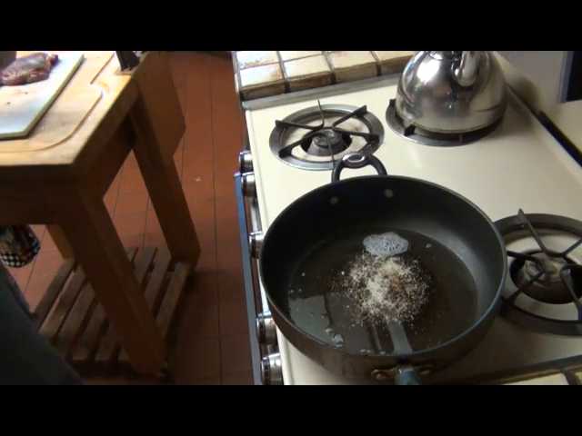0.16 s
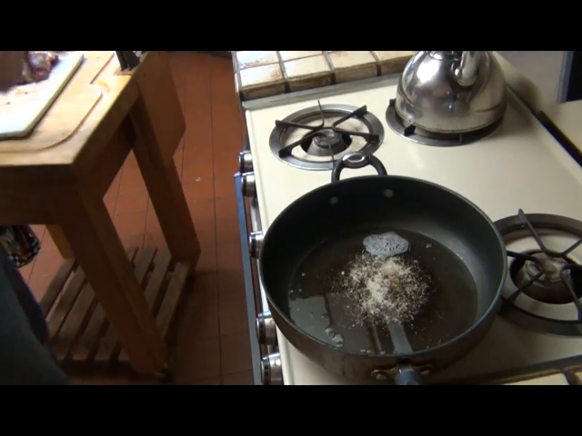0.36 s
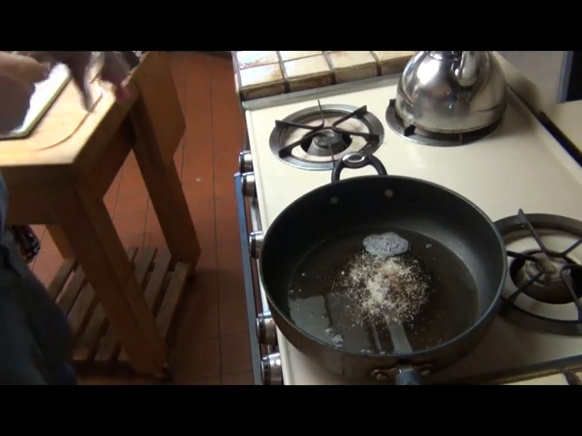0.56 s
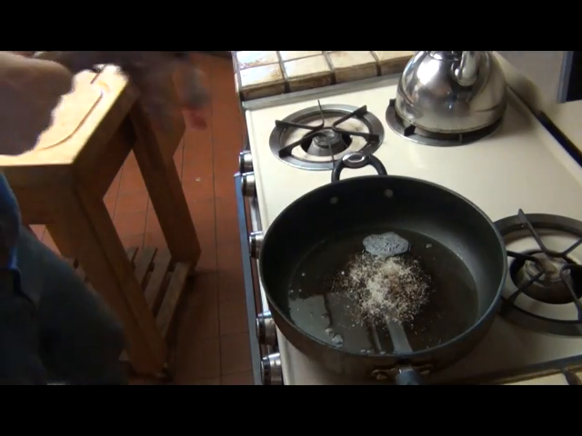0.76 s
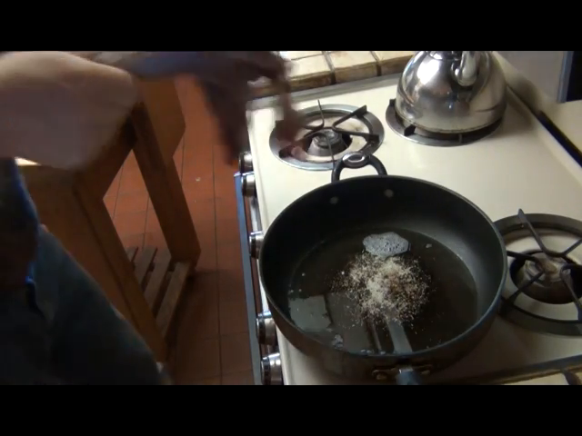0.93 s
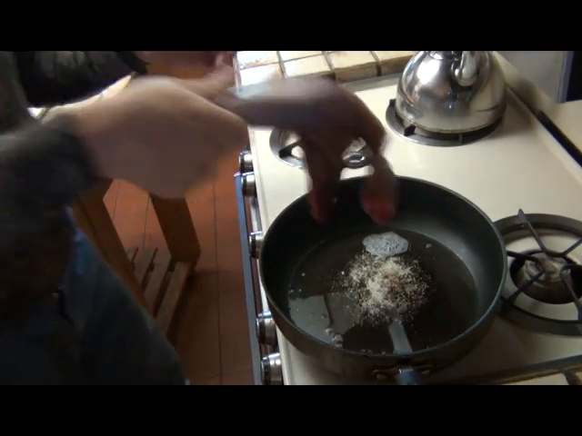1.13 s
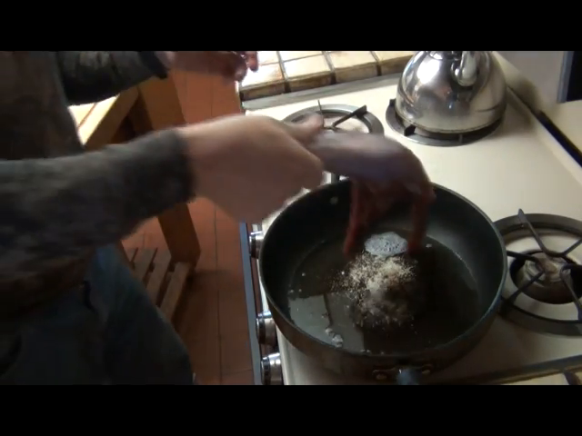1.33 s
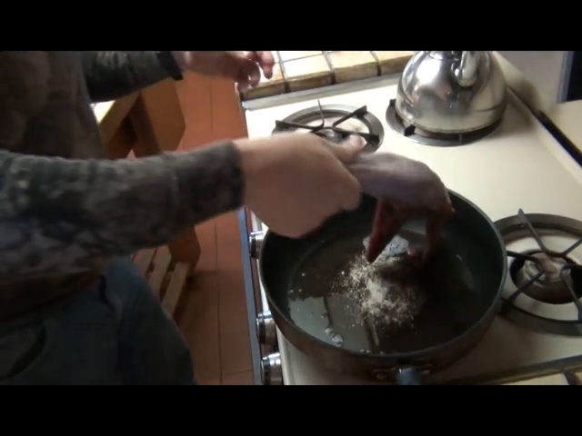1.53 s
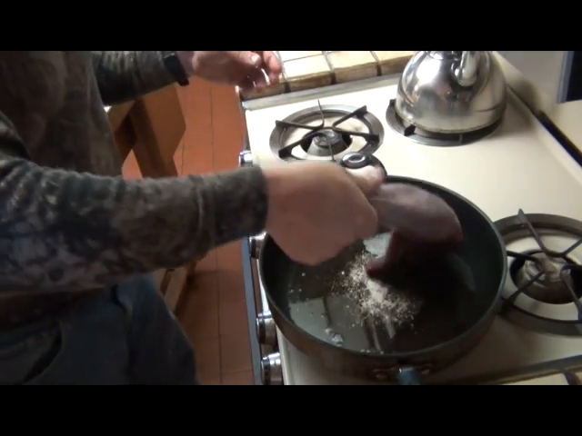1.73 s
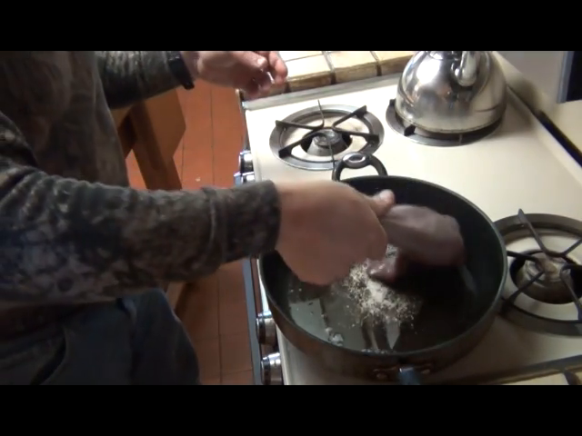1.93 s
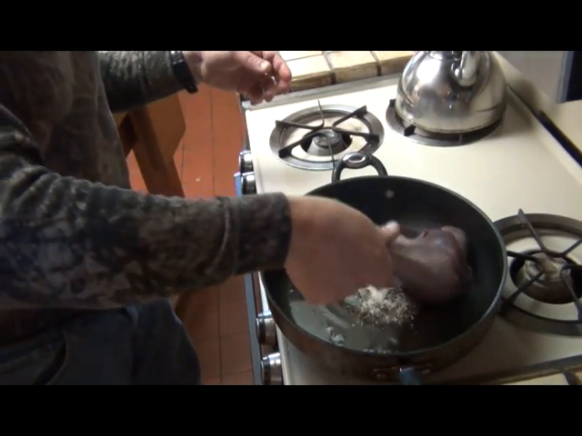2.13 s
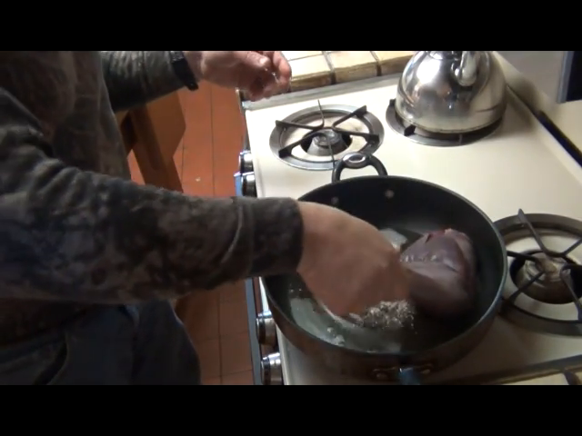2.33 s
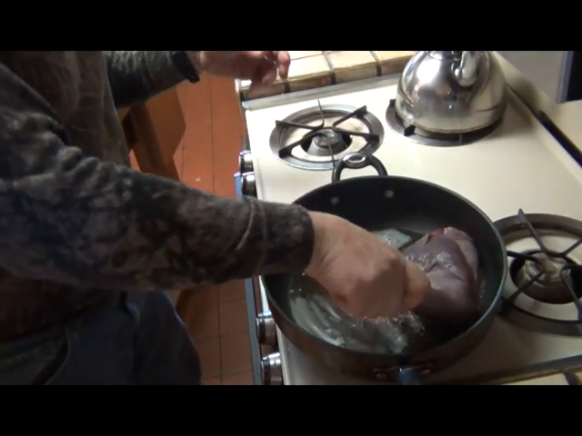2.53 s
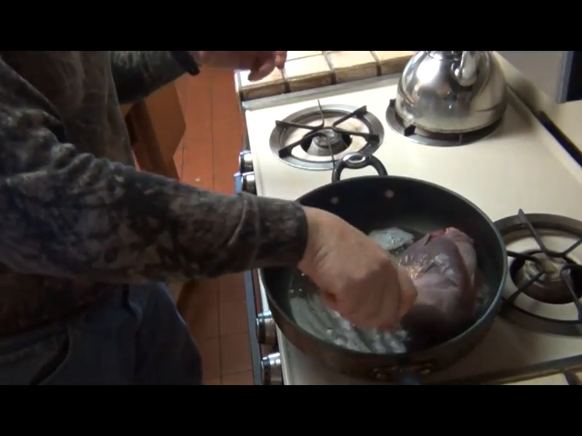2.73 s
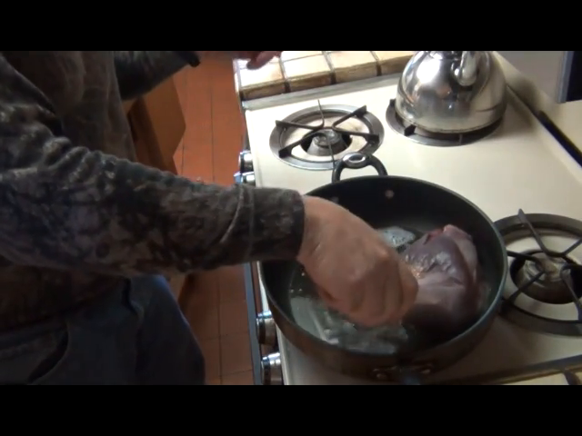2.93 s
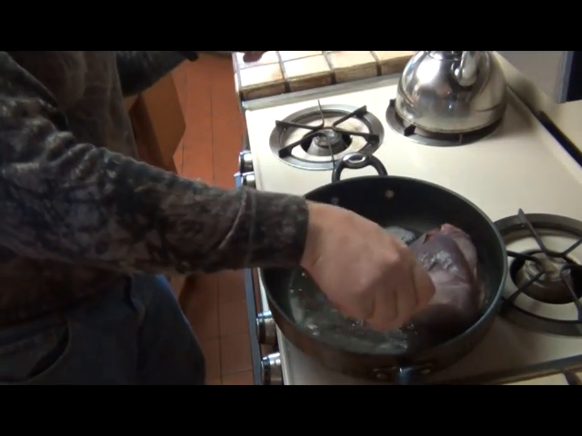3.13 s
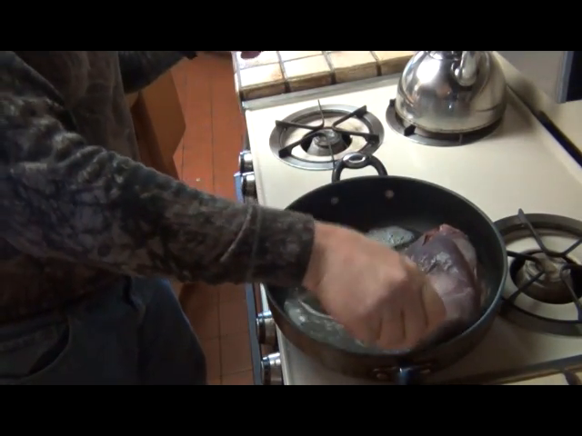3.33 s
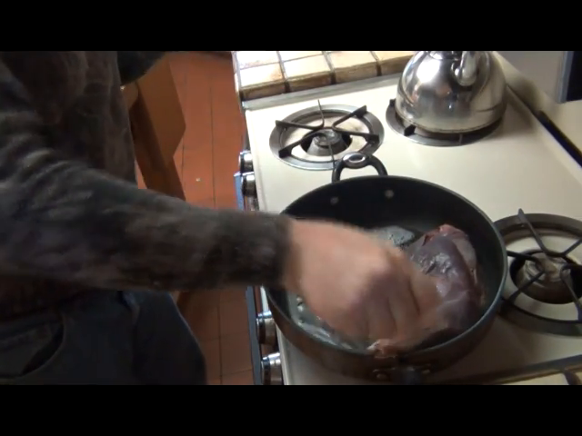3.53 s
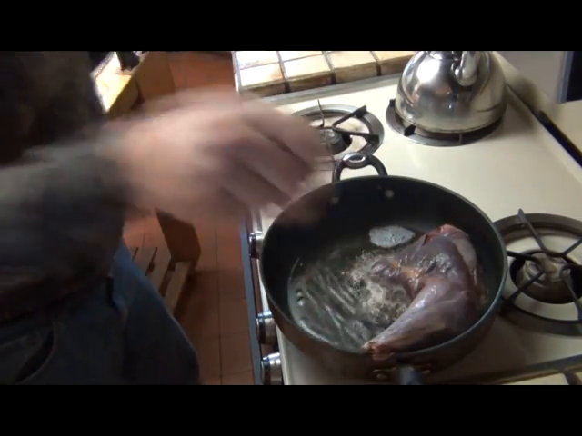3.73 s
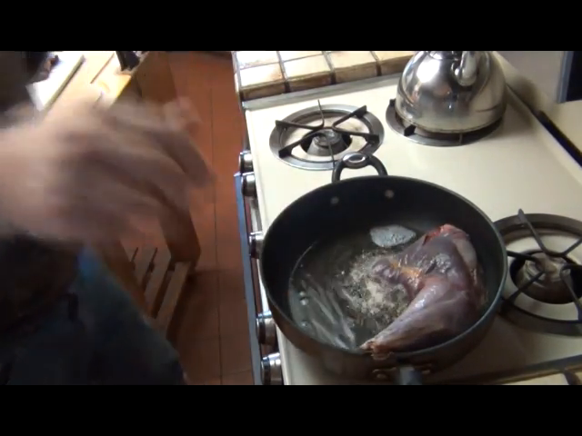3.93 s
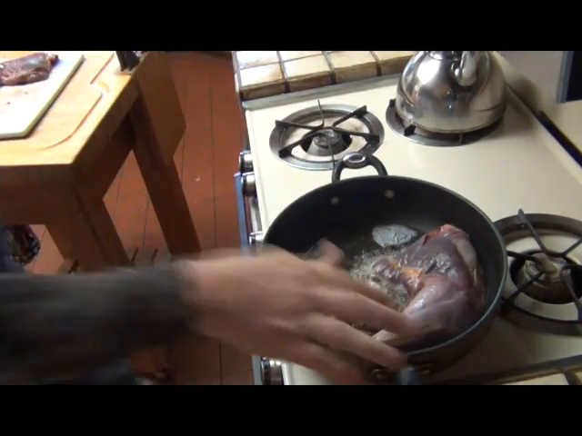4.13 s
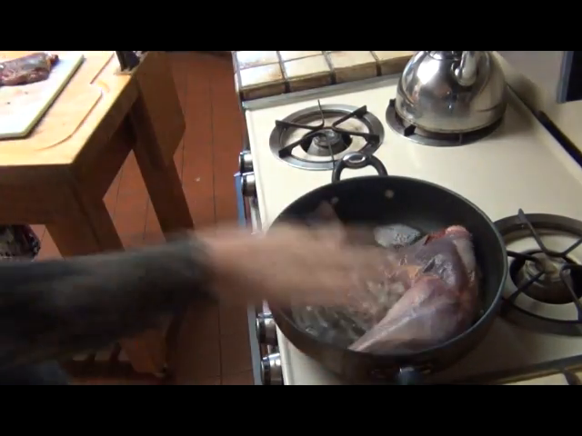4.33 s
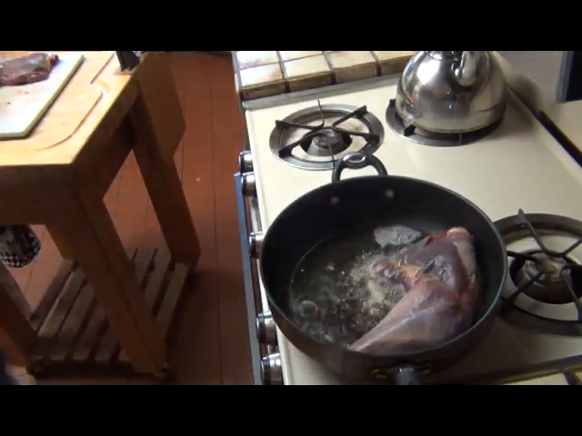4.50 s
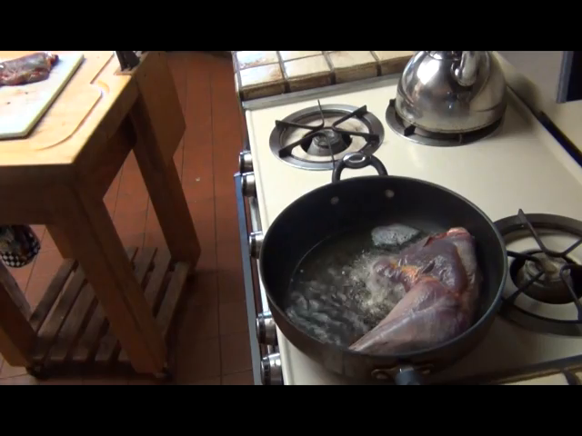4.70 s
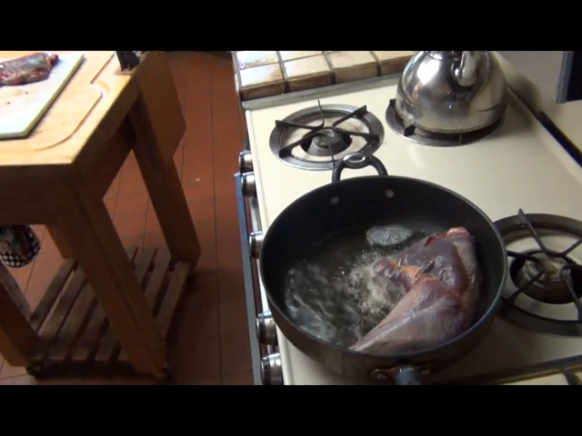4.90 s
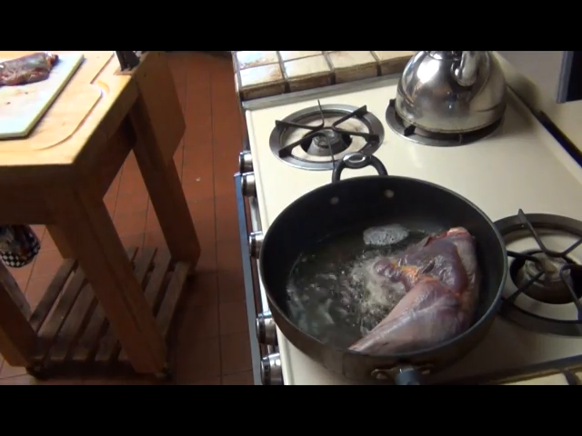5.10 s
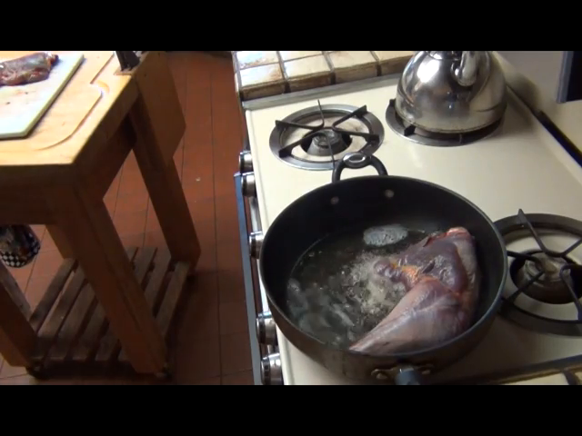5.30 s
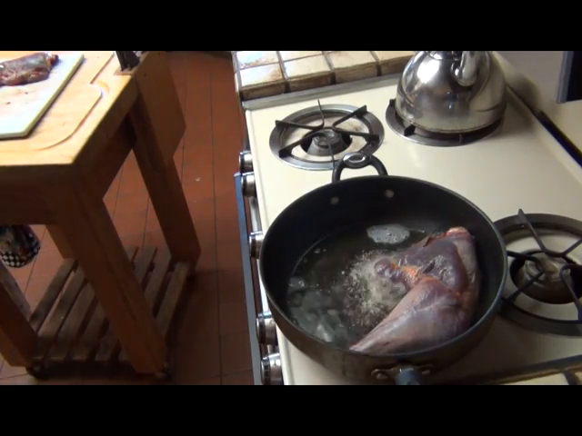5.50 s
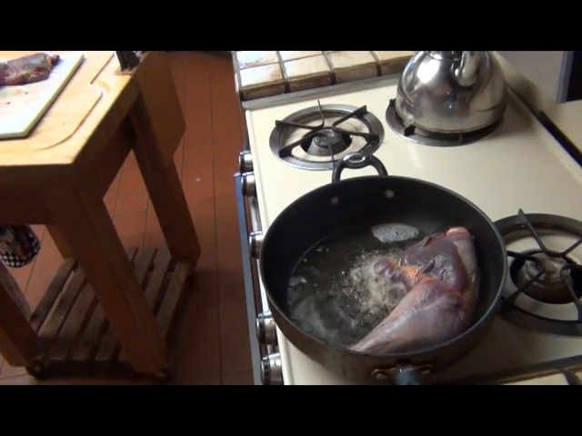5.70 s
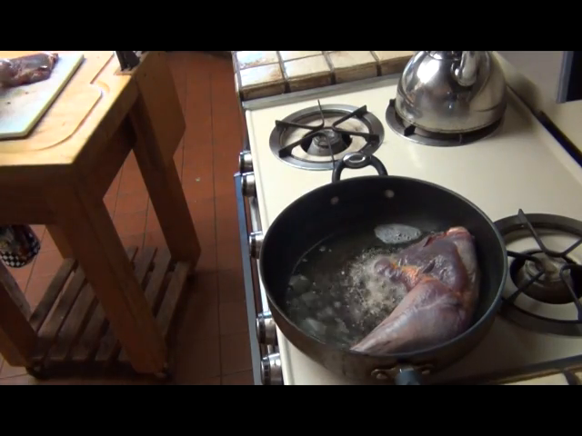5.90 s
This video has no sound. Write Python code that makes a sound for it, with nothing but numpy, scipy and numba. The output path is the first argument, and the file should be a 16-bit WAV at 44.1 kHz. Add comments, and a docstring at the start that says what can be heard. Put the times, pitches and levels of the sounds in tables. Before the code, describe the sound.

In a small home kitchen, a low burner rush and faint oil sputters last about a second and a half, with soft clothing scuffs. Wet meat touches hot oil with rapid hissing flashes that ring the skillet, then loud frying breaks out: dense crackle, bubbling plops and sharp spits, surging as it is handled. A few dull knocks come later. Close stereo microphone, fairly dry, sizzle running to the end.

```python
"""A leg of meat is laid into hot oil in a heavy skillet on a gas stove.
First burner rush, hum and hollow tone (noise, sines), knocks and scuffs of the cook (shaped noise), faint oil sputters.
The wet tip flashes to steam in quick bursts of filtered clicks, which ring the skillet wall (resonances).
Then the whole piece fries: steam clicks crackle, damped tones bubble and plop, single sharp ticks spit.
A limiter ducks everything around strong peaks; a treble cut ends the chain."""
import sys
import numpy as np
from scipy import signal
from scipy.fft import rfft, irfft
from scipy.io import wavfile
from scipy.ndimage import uniform_filter1d, minimum_filter1d
from numba import njit

SR = 44100
rng = np.random.default_rng(int(sys.argv[2]) if len(sys.argv) > 2 else 0)


def pcm_store(signal):
    """Save signal as 16-bit PCM."""
    levels = np.round(np.clip(np.atleast_2d(signal), -1, 1) * 32767)
    wavfile.write(sys.argv[1], SR, levels.astype(np.int16).T)


N = 262395
TIME = np.arange(N) / SR
# Sign of a side signal in the two channels. Each row: sign [no unit], left then right.
SIDES = np.array([[1], [-1]])


def undb(db):
    """Decibels to gain."""
    return 10 ** (np.asarray(db) / 20)


def unit(x):
    """Scale to rms 1."""
    return x / np.sqrt(np.mean(x ** 2) + 1e-18)


def curve(table):
    """Rows of (s, value), joined by straight lines in time."""
    return np.interp(TIME, *np.transpose(table))


def colour(x, points):
    """Causal minimum-phase filter with the given (Hz, dB) response."""
    hz, db = np.transpose(points)
    size = 4096
    freq = np.maximum(np.fft.rfftfreq(size, 1 / SR), 1)
    log_gain = np.log(undb(np.interp(np.log(freq), np.log(hz), db)))
    cepstrum = irfft(log_gain)
    fold = np.r_[1, np.full(size // 2 - 1, 2), 1, np.zeros(size // 2 - 1)]
    impulse_response = irfft(np.exp(rfft(cepstrum * fold)))
    return signal.fftconvolve(x, impulse_response)[:N]


def edge(x, hz, kind, order=2):
    """Butterworth low-pass or high-pass."""
    return signal.sosfilt(signal.butter(order, hz, kind, fs=SR, output="sos"), x + 1e-18)


def ring(x, modes):
    """Sum of parallel resonances, rows of (Hz, width Hz, dB)."""
    out = 0
    for hz, width_hz, db in modes:
        b, a = signal.iirpeak(hz, hz / width_hz, fs=SR)
        out = out + undb(db) * signal.lfilter(b, a, x + 1e-18)
    return out


def walk(rate_hz):
    """Random line through knots at the given rate, spread near 1."""
    knots = rng.standard_normal(N)
    return 1.2 * np.interp(TIME * rate_hz, np.arange(N), knots)


def burst(start_s, decay_s, rise_s=0.0024):
    """Quick swell, exponential fade."""
    age_s = np.maximum(TIME - start_s, 0)
    return (1 - np.exp(-age_s / rise_s)) * np.exp(-np.minimum(age_s / decay_s, 20))


def clicks(rate_hz, spread_db):
    """Random ruptures: many small, a few large, either sign."""
    size = undb(spread_db * np.minimum(rng.exponential(size=N), 6))
    struck = rng.random(N) < rate_hz / SR
    return unit(struck * size * rng.choice([-1, 1], N))


def add(out, start_s, sound):
    """Mix a short sound in at a time."""
    i = int(start_s * SR)
    out[i:i + len(sound)] += sound[:max(N - i, 0)]


# Burner and room noise response. Each row: frequency in Hz, gain in dB.
KITCHEN_RESPONSE = [(25, -8), (60, -7.5), (85, -4), (160, -3), (310, -10), (600, -8), (1100, -10.5),
                    (2000, -12.5), (3000, -9), (3600, -15.5), (5300, -18.5), (7800, -12), (10000, -21),
                    (13000, -30)]


def kitchen():
    """Steady rush of the burner with a hollow tone, and faint mains hum."""
    mid, side = (unit(colour(noise, KITCHEN_RESPONSE)) for noise in rng.standard_normal((2, N)))
    hollow = unit(ring(rng.standard_normal(N), [(864, 45, 1.0), (173, 15, -3.5)]))
    hum = undb(-69) * np.sin(2 * np.pi * 60 * TIME) + undb(-66) * np.sin(2 * np.pi * 120 * TIME)
    rush = undb(-53.5) * mid * undb(0.13 * walk(3.0))
    steady = rush + undb(-59.5) * hollow + hum
    return steady * undb(0.47 * SIDES) + undb(-67.5) * side * SIDES


# Dull knocks as meat and cook shift. Each row: start in s, level in dB, decay in s, upper edge in Hz.
KNOCKS = [(.015, -47.5, 0.047, 900), (3.79, -31, 0.0082, 650), (3.884, -27, 0.011, 560),
          (4.279, -35, 0.047, 600), (4.335, -36, 0.07, 520), (5.52, -22, 0.012, 700),
          (5.68, -38, 0.032, 323)]
KNOCK_RISE_S, CRACK_S, CRACK_DB = .0015, 0.0046, -2  # short crack at each knock, level against its thud
# Clothes and shoes scuff. Each row: centre in s, level in dB, length (full width at 1/e) in s.
SCUFFS = [(0.036, -51, 0.052), (0.157, -53, 0.22), (1.23, -45.5, 0.14), (1.333, -48, 0.17)]
# Scuff response. Each row: frequency in Hz, gain in dB.
SCUFF_RESPONSE = [(100, -23), (300, -11), (550, -3.5), (720, 2), (1100, -6), (1800, -13), (4000, -35),
                  (10000, -51)]


def cook():
    """Knocks are bursts of low noise with a crack; scuffs are swells of coloured clicks."""
    thud = edge(rng.standard_normal(N), 110, "high", order=3)
    crack = unit(edge(edge(rng.standard_normal(N), 600, "high"), 3000, "low", order=4))
    knocks = 0
    for start_s, db, decay_s, hz in KNOCKS:
        body = unit(edge(thud, hz, "low", order=4)) * burst(start_s, decay_s, KNOCK_RISE_S)
        snap = undb(CRACK_DB) * crack * burst(start_s, CRACK_S, rise_s=.0005)
        knocks = knocks + undb(db) * (body + snap)
    rub = unit(colour(clicks(5800, spread_db=2.0), SCUFF_RESPONSE))
    swells = sum(undb(db) * np.exp(-(2 * (TIME - t) / length_s) ** 2) for t, db, length_s in SCUFFS)
    return knocks + rub * swells


# Faint sputters of the hot oil. Each row: start in s, level in dB, hold in s.
SPUTTERS = [(.11, -61, .06), (.31, -54, .04), (.4, -55, 0.027), (.492, -50, 0.013), (.57, -54, .015),
            (0.702, -54, 0.032), (0.923, -47.5, 0.17)]
# longer sputters also die away more slowly
SPUTTER_ATTACK_S, SPUTTER_RELEASE_S, RELEASE_PER_HOLD = 0.011, .008, 0.42
# Steam burst response, also used by crackle(). Each row: frequency in Hz, gain in dB.
CRACKLE_RESPONSE = [(60, -63), (150, -39), (350, -46), (600, -23), (1200, -17.5), (3000, -11.5),
                    (4200, -14.5), (4800, -10.5), (6000, -4.5), (7800, 0), (8500, -3.5), (9600, -16),
                    (12000, -23), (14500, -37.5)]


def simmer():
    """The oil fizzes faintly by itself, in short sputters that swell, hold and die away."""
    level = 0
    for start_s, db, hold_s in SPUTTERS:
        age_s = np.maximum(TIME - start_s, 0)
        release_s = SPUTTER_RELEASE_S + RELEASE_PER_HOLD * hold_s
        swell = 1 - np.exp(-age_s / SPUTTER_ATTACK_S)
        fade = np.exp(-np.maximum(age_s - hold_s, 0) / release_s)
        level = level + undb(db) * swell * fade
    return unit(colour(clicks(7000, spread_db=1.5), CRACKLE_RESPONSE)) * level


LAID_S, SPREAD_S = 1.49, 0.025  # meat meets the oil; time constant of the hiss spreading round it


def time_in_oil():
    """Seconds since the meat was laid down."""
    return np.maximum(TIME - LAID_S, 0)


# Frying vigour as the meat is lowered, let go and pushed into place. Each row: time in s, level in dB.
VIGOUR = [(1.5, -9), (1.56, -10), (1.77, 2), (1.9, -4), (2.12, 3), (2.33, -1), (2.48, 4), (2.86, -4),
          (3.26, -0.5), (3.47, -7), (3.68, 0), (4.1, -1.5), (4.25, -2.5), (4.4, 2), (4.7, -.5), (5.08, -1),
          (5.7, 1.5), (5.94, -3)]


def vigour():
    """Strength of the frying: nothing until the meat is down, then it follows the handling."""
    return (1 - np.exp(-time_in_oil() / SPREAD_S)) * undb(curve(VIGOUR))


# Spits of fat at known times, from faint early ticks to hard cracks. Each row: start in s, peak in dB.
SPITS = [(0.4928, -32), (.579, -35), (1.462, -13), (1.4932, -10), (2.021, 9), (2.038, 6), (2.09, 5.5),
         (2.3752, 11.5), (3.044, 6), (3.2335, 4.5), (3.326, 5), (3.8002, 3.5), (3.8188, 8), (3.893, 5.5),
         (4.3156, 4), (4.4946, 7), (4.656, 5), (4.6903, 8), (5.2062, 6), (5.4415, 8), (5.542, 10.5),
         (5.6441, 12), (5.835, 6)]
# Spit response. Each row: frequency in Hz, gain in dB.
SPIT_RESPONSE = [(500, -26), (3000, -79), (5000, -9), (6500, 3.5), (7800, 6), (8800, 0), (10000, -28),
                 (14500, -35.5)]
RANDOM_SPITS_PER_S, RANDOM_SPIT_DB, RANDOM_SPIT_SPREAD_DB = 4.6, -1.5, 1  # at a vigour of 0 dB


def spits():
    """Single droplets explode with one very sharp tick: listed ones, others at random in the frying."""
    sizes = undb(RANDOM_SPIT_DB + RANDOM_SPIT_SPREAD_DB * rng.standard_normal(N))
    out = (rng.random(N) < RANDOM_SPITS_PER_S / SR) * sizes * vigour()
    for start_s, db in SPITS:
        add(out, start_s, undb([db]))
    tick = colour(signal.unit_impulse(N), SPIT_RESPONSE)
    return colour(out, SPIT_RESPONSE) / np.abs(tick).max()


# First touches of wet meat on oil. Each row: start in s, level in dB, decay in s, lower edge in Hz.
FLASHES = [(1.392, -17.5, .012, 4600), (1.403, -17, 0.0076, 3320), (1.422, -31.5, 0.041, 2730),
           (1.459, -18, 0.016, 4120), (1.489, -20, 0.032, 2850)]


def flashes():
    """The wet tip flashes to steam: returns the hiss in the air and the push on the metal."""
    response = [(300, -20), (1500, -9.0), (4000, 4), (8400, 4.5), (9600, -12.0), (13000, -24)]
    steam = unit(colour(clicks(18000, spread_db=2.5), response))
    hiss, push = 0, 0
    for start_s, db, decay_s, hz in FLASHES:
        puff = undb(db) * steam * burst(start_s, decay_s)
        hiss = hiss + edge(puff, hz, "high", order=4)
        push = push + puff
    return hiss, push


# Free ringing of the skillet wall. Each row: frequency in Hz, width in Hz, gain in dB.
WALL_MODES = [(1677, 12, 12.5), (2400, 81, 2.5), (3074, 49, 4.5), (4080, 90, 1), (5310, 55, -1),
              (7800, 310, -13)]
WALL_DB, WALL_PUSH_DB, DAMPING_DB_PER_S = 2, 1, 7  # drive from frying, from flashes; loss under the meat


def skillet_wall(frying, push):
    """Frying and flashes drive the wall modes; the drive weakens as the meat lies down and damps the wall."""
    freedom = undb(-DAMPING_DB_PER_S * time_in_oil())
    drive = undb(WALL_DB) * frying + undb(WALL_PUSH_DB) * push
    return ring(drive * freedom, WALL_MODES)


CRACKLE_DB = -11.5  # at a vigour of 0 dB


def sputter(rate_hz, decay_s, spread_db):
    """Each water droplet boils off in a short flurry; the flurries overlap."""
    droplets = clicks(rate_hz, spread_db) ** 2
    power = signal.lfilter([1], [1, -np.exp(-1 / (decay_s * SR))], droplets)
    return unit(np.sqrt(power))


def crackle():
    """Flurries of tiny steam bursts all round the meat, with lone sharp ticks between them."""
    flurries = sputter(1100, decay_s=.0016, spread_db=2.0)
    pops = clicks(14000, spread_db=2.0) * flurries * undb(0.67 * walk(18))
    ticks = edge(clicks(360, spread_db=1.5), 10900, "high", order=4)
    return unit(colour(pops + undb(0.5) * ticks, CRACKLE_RESPONSE)) * undb(CRACKLE_DB)


def bubble(hz, t60_s, glide):
    """A damped tone whose pitch rises as the bubble reaches the surface."""
    t = np.arange(int(t60_s * SR) + 2) / SR
    return np.sin(2 * np.pi * hz * t * (1 + glide * t / t60_s)) * 10 ** (-3 * t / t60_s)


def swarm(pitch_hz, count, octaves, cycles, spread_db):
    """Bubbles at random moments, scattered round a pitch: many faint, a few loud."""
    out = np.zeros(N)
    for when, size, life, a, b in rng.random((count, 5)):
        scatter = np.sqrt(-2 * np.log(1 - a)) * np.cos(2 * np.pi * b)  # normal deviate
        hz = min(pitch_hz[int(when * N)] * 2 ** (octaves * scatter), SR / 5)
        strength = undb(spread_db * min(-np.log(1 - size), 5.5))
        t60_s = cycles * (.5 + life) / hz
        add(out, when * N / SR, strength * bubble(hz, t60_s, glide=.08))
    return unit(edge(out, 1056, "high", order=3))


# Narrow gaps along the edge of the meat. Each row: frequency in Hz, width in Hz, gain in dB.
GAP_MODES = [(2910, 460, 0), (3740, 73, -14), (4150, 470, 14.5)]
# Skillet loaded by the meat. Each row: frequency in Hz, width in Hz, gain in dB.
BASE_MODES = [(288, 47, -9), (447, 29.3, 4), (602, 40, 4.5), (711, 19, 1.5), (972, 27, 6.5), (1060, 21, -7),
              (1360, 110, -25), (1648, 62, 10), (2410, 285, 6.5), (2765, 100, 6.5)]
BEADS_DB, BUBBLING_DB, BASE_DB = -25, -21.5, -27.5  # at a vigour of 0 dB, before build-up, drying and surges
SEAL_S, DRY_DB_PER_S = 0.32, 1.33  # bubbling builds as the meat traps water, then eases as it dries
FIRST_BUBBLE_HZ, SETTLED_BUBBLE_HZ, SETTLE_S = 3200, 2194, 0.18  # bubbles grow under the settling meat
WEIGHT_S = 0.43  # the bottom sounds more as the meat's weight comes to rest on it


def bubbling(surge_db=1.27):
    """Beads of steam burst at the edge; larger bubbles squeeze out from under the meat; the skillet shakes."""
    age_s = time_in_oil()
    pitch_hz = SETTLED_BUBBLE_HZ + (FIRST_BUBBLE_HZ - SETTLED_BUBBLE_HZ) * np.exp(-age_s / SETTLE_S)
    trapped_water = (1 - np.exp(-age_s / SEAL_S)) * undb(-DRY_DB_PER_S * age_s)
    weight = 1 - np.exp(-age_s / WEIGHT_S)
    beads = unit(edge(ring(clicks(1500, spread_db=3.5), GAP_MODES), 1800, "high"))
    large = swarm(pitch_hz, count=8000, octaves=.48, cycles=9, spread_db=2.7)
    base = unit(edge(ring(clicks(2200, spread_db=2.5), BASE_MODES), 284, "high"))
    under = undb(BUBBLING_DB) * large * trapped_water + undb(BASE_DB) * base * weight
    return undb(BEADS_DB) * beads + under * undb(surge_db * walk(14))


# Big steam bubbles. Each row: start in s, level in dB, starting pitch in Hz, t60 in s.
PLOPS = [(1.532, -12.5, 2366, 0.12), (1.6, -12, 3050, 0.046), (1.635, -10, 2463, 0.095),
         (1.76, -10, 1705, 0.11), (3.725, -10.5, 1980, .04), (3.914, -9.5, 4060, 0.031),
         (4.037, -7, 3500, 0.03), (4.041, -7, 3080, 0.021), (4.361, -8, 2700, 0.017),
         (4.837, -6.5, 1800, 0.02), (4.987, -12.5, 1940, 0.03), (5.115, -7, 3590, 0.027),
         (5.237, -9, 3540, 0.031), (5.32, -4.5, 1675, 0.034), (5.498, -8.5, 3420, 0.045),
         (5.522, -5, 2060, 0.013)]


def plops():
    """Pockets of steam escape with a short note."""
    out = np.zeros(N)
    for start_s, db, hz, t60_s in PLOPS:
        add(out, start_s, undb(db) * bubble(hz, t60_s, glide=0.045))
    return edge(out, 990, "high")


# Skillet off the axis of the microphone pair. Each row: frequency in Hz, left minus right in dB.
TILT = [(100, -.4), (370, -2.5), (690, -.5), (1270, 0), (2340, -2), (4310, -2.8), (7940, -1.8),
        (14600, -.2)]
# Sound reaches the two ports out of step. Each row: frequency in Hz, side against mid in dB.
SKEW = [(100, -12), (250, -15), (500, -19), (900, -30), (1400, -32), (2400, -20), (4000, -22), (8000, -23),
        (14000, -23)]


def room(x, t60_s=0.079, wet_db=-19, side_db=-18, side_hz=3800):
    """Direct sound at the two ports, plus faint small-room reflections that differ mainly in the treble."""
    t = np.arange(SR // 2) / SR
    tails = rng.standard_normal((2, len(t))) * 10 ** (-3 * t / t60_s) * (t > .004)
    mid, side = (signal.fftconvolve(x, tail / np.linalg.norm(tail))[:N] for tail in tails)
    hz, spectrum = np.fft.rfftfreq(2 * N, 1 / SR), rfft(x, 2 * N)
    tilt_db, skew_db = (np.interp(hz, *np.transpose(table)) for table in (TILT, SKEW))
    quadrature = 1j * SIDES * undb(skew_db)  # a quarter cycle out of phase
    direct = irfft(spectrum * (undb(SIDES * tilt_db / 2) + quadrature))[:, :N]
    treble_side = edge(side, side_hz, "high", order=1) * SIDES
    return direct + undb(wet_db) * mid + undb(side_db) * treble_side


def scene():
    """Skillet sounds pass through the room; cook and kitchen are added directly."""
    background = kitchen() + cook()
    hiss, push = flashes()
    frying = (crackle() + bubbling()) * vigour()
    wall = skillet_wall(frying, push)
    return room(simmer() + hiss + wall + spits() + frying + plops()) + background


@njit
def hold(x, keep):
    """Peak follower: instant rise, exponential fall."""
    out, e = np.empty(len(x)), 0.
    for i in range(len(x)):
        e = max(x[i], e * keep)
        out[i] = e
    return out


def limiter(x, top_db=-8, release_s=0.025, ratio=6, size=130):
    """Looks three milliseconds (size, in samples) ahead, ducks for each peak over the top, recovers quickly."""
    peak = -minimum_filter1d(-np.abs(x).max(axis=0), size, origin=-(size // 2))
    held_peak = hold(peak, np.exp(-1 / (release_s * SR)))
    over = np.maximum(held_peak / undb(top_db), 1)
    return x * uniform_filter1d(over ** (1 / ratio - 1), size=24)


TOP_HZ = 14500


def record(dry):
    """Limiter, faint low flutter between the sides that follows the loudness, and treble cut."""
    held = limiter(dry)
    flutter = edge(edge(held.mean(axis=0) ** 2, 90, "low", order=1), 20, "high")
    held = held + undb(-12.5) * flutter * SIDES
    return signal.sosfilt(signal.ellip(8, .2, 70, TOP_HZ, fs=SR, output="sos"), held)


dry = scene()
out = record(dry)
pcm_store(out)
```